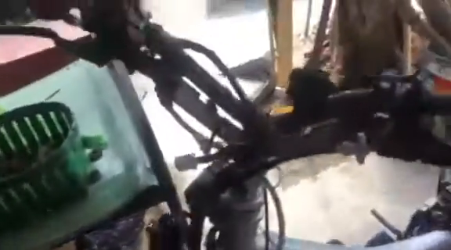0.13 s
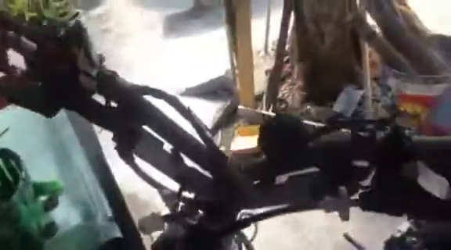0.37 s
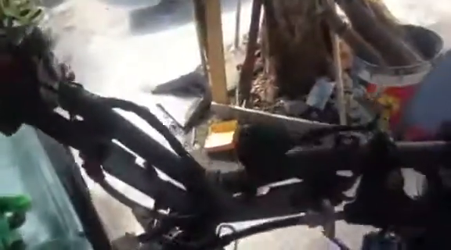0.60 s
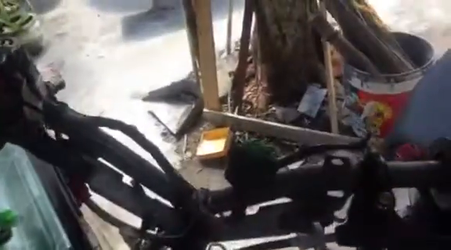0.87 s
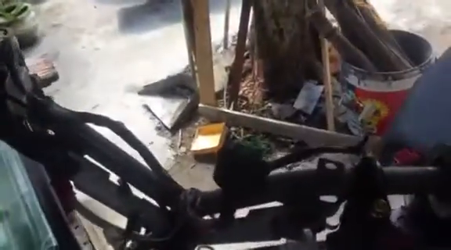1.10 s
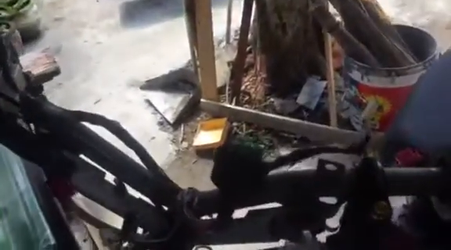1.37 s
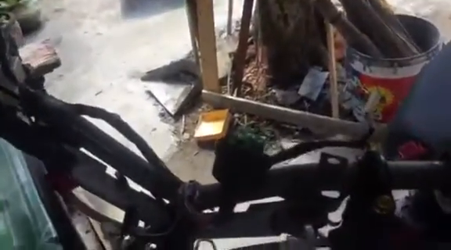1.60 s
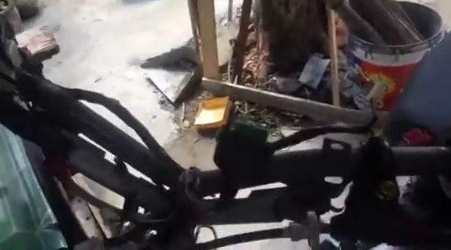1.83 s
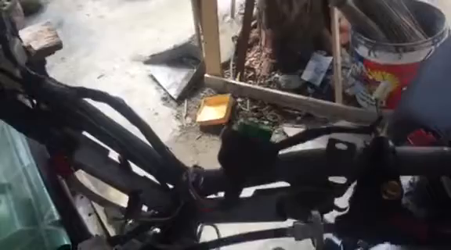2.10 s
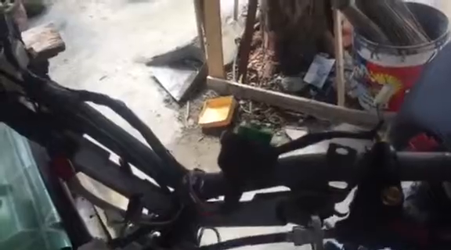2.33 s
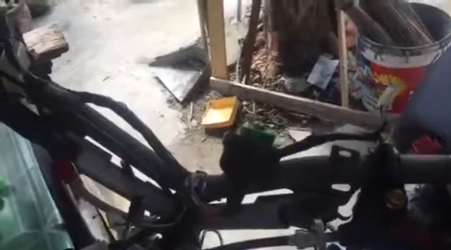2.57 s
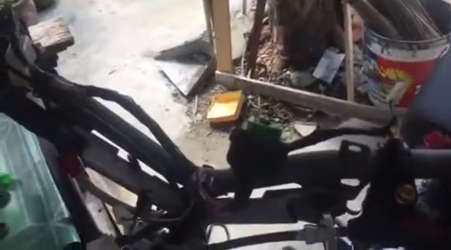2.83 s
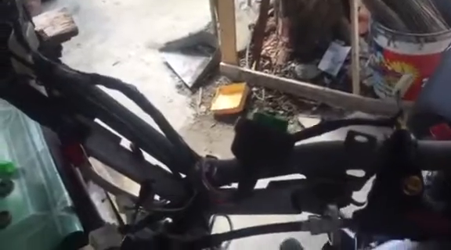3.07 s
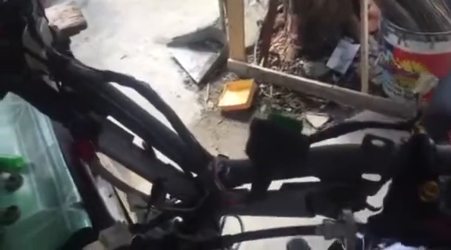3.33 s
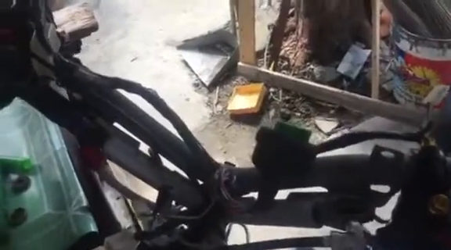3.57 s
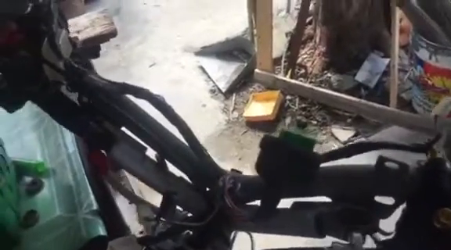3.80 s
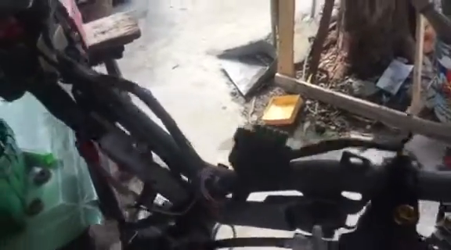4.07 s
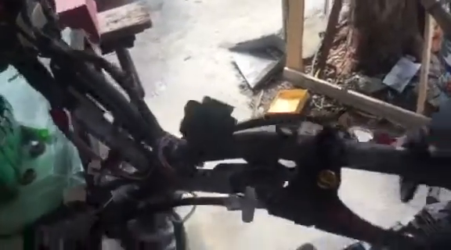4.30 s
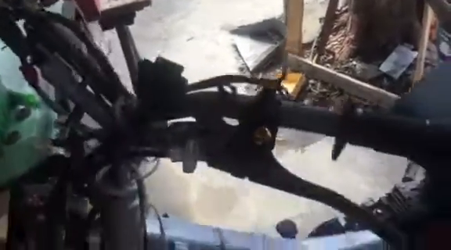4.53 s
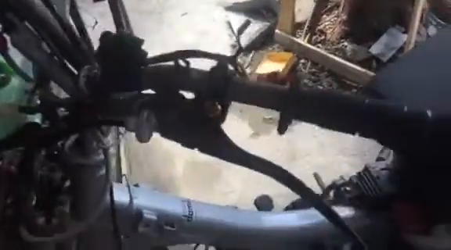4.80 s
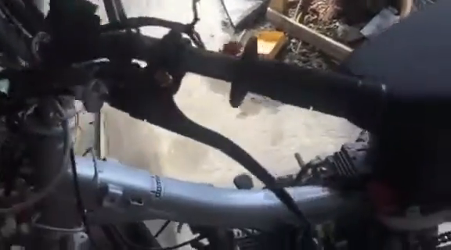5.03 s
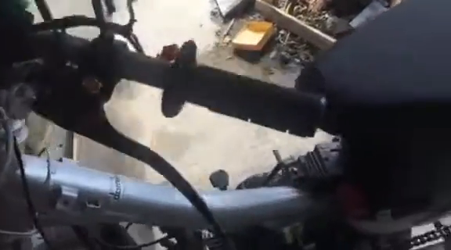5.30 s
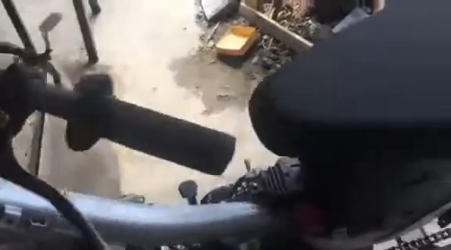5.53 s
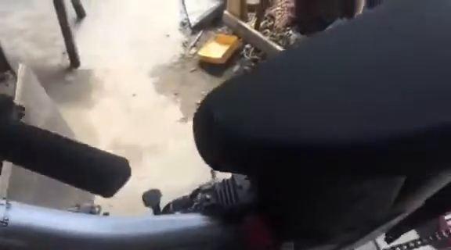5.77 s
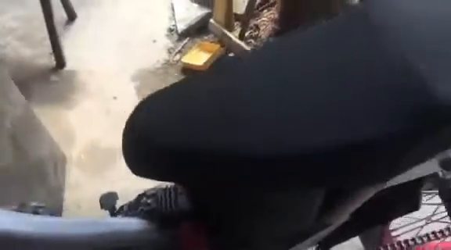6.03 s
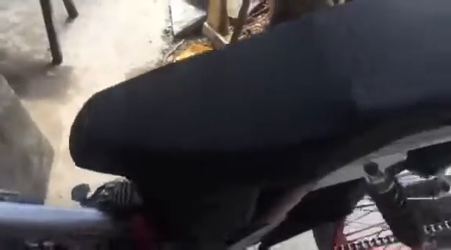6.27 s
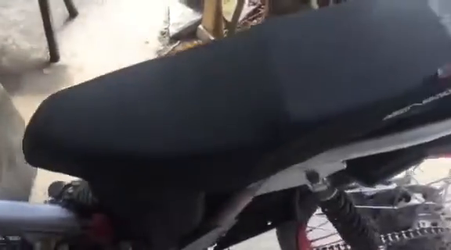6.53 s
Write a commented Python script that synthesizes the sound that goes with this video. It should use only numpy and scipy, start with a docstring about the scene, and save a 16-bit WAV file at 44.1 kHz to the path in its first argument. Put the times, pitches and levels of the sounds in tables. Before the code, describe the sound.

A single-cylinder motorcycle idles loudly and unevenly close by, thumping and spitting through its exhaust, with two short throttle blips in a small yard.

```python
"""Motorcycle idling in a yard

A single-cylinder motorcycle idles unevenly close to a phone: it fires on about every second cycle, and two
throttle blips give short runs of hard firings. Each exhaust stroke rings the pipe's modes, cracks at the outlet
and spits a jet of hiss. Filtered noise makes the valve ticks, the whir of chain and gears and the intake rasp;
nearby walls answer, and the loudest blasts overload the microphone."""
import sys
import numpy as np
from scipy import signal
from scipy.fft import rfft, irfft, next_fast_len
from scipy.io import wavfile
from scipy.ndimage import uniform_filter1d, map_coordinates

SR = 44100
rng = np.random.default_rng(int(sys.argv[2]) if len(sys.argv) > 2 else 0)


def unload_wav(signal):
    """Save mono or channel-first audio to the path in sys.argv[1] as 16-bit WAV at rate SR, clipped to [-1, 1]."""
    wavfile.write(
        sys.argv[1],
        SR,
        np.round(np.clip(np.atleast_2d(signal).T, -1, 1) * 32767).astype(np.int16),
    )


def magnitude_from_level(level_db):
    """Linear magnitude for a level in decibels (20 dB per decade)."""
    exponent = np.asarray(level_db, float) / 20
    return 10 ** exponent


N = 292824

# All levels are relative.
# Wall echoes against the direct sound: delay_s, level_db
WALL_ECHOES = [(.011, -16), (0.026, -17.5), (0.049, -19.5), (0.061, -21)]
# Decay of the yard's diffuse tail: band_hz, t60_s
YARD_DECAY = [(80, 0.14), (500, 0.27), (3000, 0.25), (9000, 0.057)]
# Spectrum of chain and gears: band_hz, level_db
WHIR_SPECTRUM = [(260, -21), (450, -1), (795, -1.5), (903, -0.5), (1700, -0.5), (2250, -4), (2420, -5),
                 (3240, -10), (4230, -16), (8380, -27.5), (9270, -50), (12100, -58.5), (20400, -120)]
# Running noise over time: time_s, whir_db, tick_db
RUNNING_LEVELS = [(0.0, -31, -30), (0.6, -32.5, -30), (1.35, -34.5, -29.5), (1.55, -31.5, -29.5),
                  (1.7, -31, -40.5), (1.87, -35.5, -60), (2.42, -36.5, -40), (2.74, -34.5, -28.5),
                  (2.94, -30.5, -30), (3.16, -35, -35), (3.92, -34, -32), (5.05, -33, -28.5),
                  (6.64, -33.5, -32)]
# Resonances of the engine cases: pitch_hz, width_hz, level_db
CASE_RESONANCES = [(1830, 110, 3), (2620, 270, -6.5), (3730, 810, -4.5), (4500, 200, -0.5),
                   (5350, 430, -4.5), (6430, 750, -1), (6980, 650, -1), (8610, 260, -1)]
# Resonances of the open carburettor: pitch_hz, width_hz, level_db
INTAKE_RESONANCES = [(2170, 310, -2.5), (2586, 250, 0.5), (2999, 350, -0.5), (5550, 450, -6.5),
                     (6600, 350, -11.5)]
# Throttle blips: start_s, open_for_s, rasp_db, speed_gain_cycles_per_s, boom_gain_hz
BLIP_LIST = [(1.585, .3, -21, 15.5, 21), (2.916, .21, -19.5, 10, 13.1)]
# Cycles that fire: start_s, boom_db, bark_db, jet_db, rise_ms
FIRING_LIST = [(-0.107, -1.5, 10, -20, 11), (0.085, 5, 3, -16, 11), (0.2733, 4, 3, -25, 23),
               (0.4783, 3.5, 0, -15.5, 3.4), (0.6617, 2.5, 2.5, -20, 11), (0.8574, 4.5, 4, -19.5, 19),
               (1.058, 4.5, 3, -19, 12), (1.2691, 3, -2.5, -17, 5.5), (1.486, 2, -1, -23.8, 14),
               (1.6031, 2.5, 3.5, -14.5, 2.5), (1.6685, 2, -1.5, -13.5, 0.7), (1.721, 1.5, 4, -15, 1.1),
               (1.7613, 3.5, 0.5, -17, 0.6), (1.8416, -2.5, -0.5, -21.5, 0.72),
               (2.4393, -3.5, -1, -28.5, 10), (2.6328, -37, -9.5, -40, 6.3), (2.7742, -2, 2, -17, 6.8),
               (2.92, 1.5, 4.5, -15, 5.5), (2.9778, 1, 4, -19, 5.7), (3.0296, -7, 1.5, -21.5, 2.5),
               (3.0765, -0.5, 0, -24.5, 1.3), (3.3653, -10, -7.5, -32, 12), (3.4154, -1, 2.4, -25, 8.6),
               (3.5911, -30, -3, -36, 26), (3.651, -8, -0.5, -29, 9.7), (3.782, -5.5, 2, -18.5, 8),
               (3.9206, -5, -0.5, -17, 4.9), (4.0603, -5, -2.5, -33, 7.1), (4.2152, -1.5, 0.5, -20.5, 5.6),
               (4.373, -0.5, 1.5, -18.5, 8), (4.5329, -0.5, 1, -17.5, 5), (4.6841, -3, -2.5, -30, 9.7),
               (4.7638, -12, -8, -28, 3.9), (4.8449, -1.5, 2.5, -21, 6.3), (5.0164, 2, 3, -15.5, 7.8),
               (5.1826, 0, 1.3, -18, 6.9), (5.3561, -1, 0.8, -19.5, 7.7), (5.5397, 1, 3, -19, 7.7),
               (5.7143, 2.2, 4.5, -18, 11), (5.8811, -1.5, 4, -29.5, 21), (5.9708, -1.5, -2.5, -17, 2.5),
               (6.1406, -2.5, -3, -23, 4.8), (6.3243, 1.5, -1.5, -18.5, 2.1), (6.497, -1, -3, -21, 7),
               (6.585, 1.5, -1.5, -18.5, 4.7)]
# Random spread of the unfired cycles (standard deviation): boom_db, bark_db, jet_db
MISS_SPREAD_DB = [2, 1.5, 3.5]
# Modes of exhaust pipe and silencer at idle boom pitch: pitch_hz, level_db, t60_s
PIPE_MODES = [(63.8, -12, 0.1), (89.14, -5, 0.2), (143.7, 8.5, 0.024), (198.3, -1, 0.062),
              (223.3, -17, 0.19), (248.2, -6, 0.023), (303, -31.5, .1), (356.3, -6.5, 0.026),
              (386.6, -22.5, 0.13), (414.8, -16, 0.093)]
# The phone drifts toward the silencer, whose shell knocks above SHELL_HZ: time_s, level_db
SHELL_NEARNESS = [(0, -4), (3.3, -4), (4.3, 2), (6.64, 1)]
# Tailpipe crack, before jet speed shifts its pitch: pitch_hz, level_db, t60_s
OUTLET_CRACK = [(1464, -8.5, 0.11), (1827, 2, 0.043), (2043, -2, 0.062), (2470, -9.5, 0.04)]
# Spectrum of the gas jet: band_hz, level_db
JET_SPECTRUM = [(290, -0.5), (500, -2), (646, -4), (921, -5.5), (2040, -4), (3050, -11), (3360, -12),
                (4620, -11), (5030, -11.5), (6670, -7), (9270, -12), (12100, -45), (20400, -120)]
# Spectrum of gas churning in the pipe: band_hz, level_db
CHURN_SPECTRUM = [(25, -47), (50, 1), (70, -14.5), (90, -2.5), (130, 2), (185, 0), (280, -13), (335, -13),
                  (362, -8.5), (400, -14), (520, -28.5), (900, -40.5)]

BOOM_HZ, SHELL_HZ = 120, 375  # boom modes lie below BOOM_HZ, bark modes above; shell modes above SHELL_HZ
IDLE_HZ = 89  # boom pitch at which the pipe modes are listed
HOT_DAMPING = 3.5  # power of the pitch ratio by which fast hot flow shortens the ring
IDLE_CYCLES_PER_S, SPIN_UP_S, COAST_S = 10.6, 0.18, 0.76  # speed climbs after a blip opens, then decays
WARM_UP_S, COOL_S = 0.2, 0.12  # hot gas raises the pipe's pitch
OPEN_S, CLOSE_S, SAG_DB_PER_S = 0.02, 0.045, 22.5  # throttle slide and sag of its rasp
# An unfired cycle only pumps gas
MISS_BOOM_DB, MISS_BARK_DB, MISS_JET_DB, MISS_RISE_MS = -6.5, -22, -39.5, 5.2
MISS_FADE_DB = 0.05  # boom lost with each further miss
BARK_DB_PER_SPEED, JET_DB_PER_SPEED = 0.85, 0.4133  # miss gain per cycle/s over idle
MISS_SHARP = 1.04  # pitch ratio
INTAKE_SHARE, INTAKE_BOOM_DB, INTAKE_FOLLOWS = 0.495, -14.5, 0.64  # place in cycle, level, share of stroke's dB


def unit(x):
    """Scale to rms 1."""
    return x / np.sqrt(np.mean(x ** 2) + 1e-20)


def along(points, hz):
    """Read (Hz, value) points on a log frequency axis."""
    f, v = np.transpose(points)
    return np.interp(np.log(hz + 1), np.log(f + 1), v)


def wobble(rate):
    """A smooth random curve, rate knots a second."""
    return map_coordinates(rng.standard_normal(int(N * rate / SR) + 4), [np.arange(N) * rate / SR])


def filtered(x, response):
    """Filter x by a response of frequency."""
    m = next_fast_len(N + SR // 2)
    return irfft(rfft(x, m) * response(np.fft.rfftfreq(m, 1 / SR)), m)[:N]


def shaped(x, spectrum):
    """Colour x by a spectrum table, at rms 1."""
    return unit(filtered(x, lambda hz: magnitude_from_level(along(spectrum, hz))))


def noise(spectrum):
    """Coloured noise of rms 1."""
    return shaped(rng.standard_normal(N), spectrum)


def resonant(x, peaks):
    """Pass x through parallel resonances of alternating sign, at rms 1."""
    def response(f):
        total = 0
        for k, (centre, width, db) in enumerate(peaks):
            band = 1j * f * width
            total = total + (-1) ** k * magnitude_from_level(db) * band / (centre * centre - f * f + band)
        return total
    return unit(filtered(x, response))


def patchy(x, depth_db):
    """Give x random patches of gain, about 700 Hz by 23 ms, at rms 1."""
    z = signal.stft(x, nperseg=256)[2]
    field = uniform_filter1d(rng.standard_normal(z.shape), size=4, axis=0)
    field = uniform_filter1d(field, size=8, axis=1)
    return unit(signal.istft(z * magnitude_from_level(depth_db * unit(field)), nperseg=256)[1][:N])


def add(track, s, sound):
    """Mix a sound into the track at s seconds."""
    i = round(s * SR)
    part = track[max(i, 0):max(i + len(sound), 0)]
    part += sound[max(-i, 0):][:len(part)]


def attack(t, rise_s):
    """Exponential onset with time constant rise_s."""
    return 1 - np.exp(-t / rise_s)


def running(column):
    """Gain curve of one column of RUNNING_LEVELS."""
    rows = np.transpose(RUNNING_LEVELS)
    return magnitude_from_level(np.interp(np.arange(N) / SR, rows[0], rows[column]))


def yard(x):
    """Nearby walls return a few echoes and a diffuse tail that dies at its own rate in each band."""
    hz, t, z = signal.stft(rng.standard_normal(SR // 2), SR, nperseg=256)
    decay = magnitude_from_level(-60 * t / along(YARD_DECAY, hz)[:, None])
    tail = signal.istft(z * decay, SR, nperseg=256)[1]
    answer = magnitude_from_level(-17) * np.pad(tail / np.linalg.norm(tail), (SR // 50, 0))
    for s, db in WALL_ECHOES:
        answer[round(s * SR)] += magnitude_from_level(db)
    return signal.fftconvolve(x, answer)[:N]


def after_blips(s, column, climb_s, fall_s):
    """What the blips add at times s: a ramp up to the column's value, then a decay once the slide shuts."""
    total = 0
    for row in BLIP_LIST:
        climb = np.clip((s - row[0]) / climb_s, 0, 1)
        fall = np.exp(-np.maximum(s - row[0] - row[1], 0) / fall_s)
        total = total + row[column] * climb * fall
    return total


def boom_pitch(s):
    """Boom pitch in Hz, raised by hot gas during the blips."""
    return IDLE_HZ + after_blips(s, 4, WARM_UP_S, COOL_S)


def cycles():
    """All strokes (start_s, boom_db, bark_db, jet_db, boom_hz, rise_ms); crank speed fits misses between firings."""
    clock = np.arange(-SR // 4, N) / SR
    extra = after_blips(clock, 3, SPIN_UP_S, COAST_S)
    turned = np.cumsum(IDLE_CYCLES_PER_S + extra) / SR
    rows = [(s, boom, bark, jet, boom_pitch(s), rise) for s, boom, bark, jet, rise in FIRING_LIST]
    at = np.interp(np.transpose(FIRING_LIST)[0], clock, turned)
    chance = rng.standard_normal((len(FIRING_LIST), 16, 3)) * MISS_SPREAD_DB
    for first, last, luck in zip(at, at[1:], chance):
        count = max(round(last - first), 1)
        between = np.linspace(first, last, count + 1)[1:-1]
        for k, s in enumerate(np.interp(between, turned, clock)):
            fast = np.interp(s, clock, extra)
            boom = MISS_BOOM_DB - MISS_FADE_DB * k
            bark = MISS_BARK_DB + BARK_DB_PER_SPEED * fast
            jet = MISS_JET_DB + JET_DB_PER_SPEED * fast
            levels = np.array([boom, bark, jet]) + luck[k]
            rows.append((s, *levels, MISS_SHARP * boom_pitch(s), MISS_RISE_MS))
    return sorted(rows)


def chain_whir():
    """Chain and gears whir as patchy noise, with loose grains where links strike."""
    strikes = (rng.random(N) < 600 / SR) * rng.standard_normal(N)  # about 600 a second
    grains = shaped(strikes * magnitude_from_level(3.7 * wobble(30)), WHIR_SPECTRUM)
    whir = magnitude_from_level(0.53 * wobble(14) + 0.73 * wobble(150)) * patchy(noise(WHIR_SPECTRUM), depth_db=2.5)
    return running(1) * (0.86 * whir + 0.54 * grains)


def valve_gear(strokes):
    """Valves seat near fixed points of every cycle and rattle the resonant engine cases."""
    starts = np.transpose(strokes)[0]
    seats = np.array([0.2, 0.45, 0.85])  # share of the cycle
    seat_db = np.array([-10, 0, -10])
    jitter = 0.0087 * rng.standard_normal((len(starts) - 1, len(seats)))
    times = starts[:-1, None] + np.diff(starts)[:, None] * (seats + jitter)
    sizes = seat_db + 2 * rng.standard_normal(times.shape)
    rattle = np.full(N, 0.15)  # steady floor under the ticks
    t = np.arange(SR // 12) / SR
    for s, size_db in zip(times.ravel(), sizes.ravel()):
        add(rattle, s, magnitude_from_level(size_db - 60 * t / 0.08) * attack(t, 0.004))
    clatter = resonant(rattle * magnitude_from_level(3 * wobble(500)) * rng.standard_normal(N), CASE_RESONANCES)
    return magnitude_from_level(-8) * running(2) * clatter


def throttle_snap():
    """The slide snaps open with a dry clack, a short burst of noise."""
    snap = np.zeros(N)
    t = np.arange(SR // 10) / SR
    for start, *_ in BLIP_LIST:
        add(snap, start + 0.0034, magnitude_from_level(-22 - 60 * t / 0.05))
    return snap * noise(WHIR_SPECTRUM)


def intake_rasp(strokes):
    """With the slide open, air rasps through the carburettor, one ragged gulp for each cycle."""
    clock = np.arange(N) / SR
    slide = np.zeros(N)
    for s, held, db, _, _ in BLIP_LIST:
        opening = (clock - s) / OPEN_S
        closing = 1 + (s + held - clock) / CLOSE_S
        slide += magnitude_from_level(db - SAG_DB_PER_S * np.abs(clock - s)) * np.clip(np.minimum(opening, closing), 0, 1)
    gulps = np.full(N, 0.15)  # steady flow between gulps
    t = np.arange(SR // 10) / SR
    for start, _, _, jet_db, _, _ in strokes:
        add(gulps, start, magnitude_from_level(jet_db + 22.5 - 60 * t / 0.098) * attack(t, 0.0037))
    rasp = resonant(rng.standard_normal(N), INTAKE_RESONANCES)
    return slide * magnitude_from_level(3.7 * wobble(300)) * gulps * rasp


def pipe_columns():
    """Pipe modes as columns, with neighbouring modes in opposite phase."""
    hz, db, t60 = np.transpose(PIPE_MODES)[:, :, None]
    sign = -(-1.0) ** np.arange(len(PIPE_MODES))[:, None]
    return hz, db, t60, sign


def intake_thumps(strokes):
    """The inlet stroke sends a weaker thump down the pipe, growing with the stroke before it."""
    track = np.zeros(N)
    t = np.arange(SR // 4) / SR
    hz, db, t60, sign = pipe_columns()
    for (s, boom_db, _, _, boom_hz, _), (after, *_) in zip(strokes, strokes[1:]):
        level_db = db + INTAKE_BOOM_DB + INTAKE_FOLLOWS * boom_db
        tones = np.sin(2 * np.pi * hz * boom_hz / IDLE_HZ * t)
        thump = (hz < BOOM_HZ) * sign * magnitude_from_level(level_db - 60 * t / t60) * tones
        add(track, s + INTAKE_SHARE * (after - s), attack(t, 0.0036) * thump.sum(axis=0))
    return track


def pipe_ring(strokes):
    """Each exhaust stroke rings the pipe's decaying modes; hotter gas sharpens and damps them."""
    ring = np.zeros(N)
    t = np.arange(SR // 4) / SR
    hz, db, t60, sign = pipe_columns()
    scatter = rng.standard_normal((len(strokes), len(PIPE_MODES), 1))
    for (s, boom_db, bark_db, _, boom_hz, rise_ms), chance in zip(strokes, scatter):
        ratio = boom_hz / IDLE_HZ
        level_db = db + np.where(hz < BOOM_HZ, boom_db, bark_db) + 0.6 * chance
        level_db = level_db + (hz > SHELL_HZ) * np.interp(s, *np.transpose(SHELL_NEARNESS))
        level_db = level_db + 1.67 * (hz > 230) * max(4 - rise_ms, 0)  # a steep front feeds the upper modes
        decay = magnitude_from_level(level_db - 60 * t / t60 * ratio ** HOT_DAMPING)
        modes = sign * decay * np.sin(2 * np.pi * hz * ratio * t)
        add(ring, s, attack(t, max(rise_ms, 0.5) / 1000) * modes.sum(axis=0))
    return ring


def outlet_crack(strokes):
    """Each stroke excites short tones at the tailpipe outlet; a faster jet cracks higher."""
    crack = np.zeros(N)
    t = np.arange(SR // 4) / SR
    hz, db, t60 = np.transpose(OUTLET_CRACK)[:, :, None]
    spread = rng.standard_normal((len(strokes), 2, len(OUTLET_CRACK), 1))
    for (s, _, _, jet_db, _, _), (size, detune) in zip(strokes, spread):
        speed = 2 ** ((max(jet_db, -24) + 21.5) / 22)
        pitch = hz * speed * (1 + 0.04 * detune)
        tones = magnitude_from_level(db + 2 * size - 60 * t / t60) * np.sin(2 * np.pi * pitch * t)
        add(crack, s, magnitude_from_level(0.75 * jet_db - 7.5) * attack(t, 0.0025) * tones.sum(axis=0))
    return crack * magnitude_from_level(3.7 * wobble(600))


def gas_jet(strokes):
    """Each stroke blows a jet of patchy hiss with a two-part decay."""
    jet = np.zeros(N)
    t = np.arange(SR // 4) / SR
    spit = magnitude_from_level(-60 * t / 0.13) + magnitude_from_level(-7.5 - 60 * t / 0.1)
    for s, _, _, jet_db, _, _ in strokes:
        add(jet, s, magnitude_from_level(jet_db + 1) * attack(t, 0.006) * spit)
    return jet * patchy(noise(JET_SPECTRUM), depth_db=4.5)


def gas_churn(strokes):
    """Gas churns in the pipe as low noise that swells with each stroke over a faint floor."""
    churn = np.zeros(N)
    t = np.arange(SR // 4) / SR
    for s, boom_db, bark_db, *_ in strokes:
        add(churn, s, magnitude_from_level(0.86 * max(boom_db, bark_db) - 60 * t / 0.27) * attack(t, 0.0087))
    return (magnitude_from_level(-22) * churn + magnitude_from_level(-35)) * magnitude_from_level(2 * wobble(22)) * noise(CHURN_SPECTRUM)


def exhaust(strokes):
    """Ring and churn sound in the pipe; gas leaves on the pressure crests and stalls in the troughs."""
    ring = pipe_ring(strokes) + intake_thumps(strokes)
    surge = magnitude_from_level(1.1 * np.clip(ring, -0.6, 0.35))
    outflow = gas_jet(strokes) + outlet_crack(strokes)
    return ring + gas_churn(strokes) + surge * magnitude_from_level(0.81 * wobble(250)) * outflow


def scene():
    """The engine and the yard's answer."""
    strokes = cycles()
    mechanics = chain_whir() + valve_gear(strokes)
    engine = mechanics + throttle_snap() + intake_rasp(strokes) + exhaust(strokes)
    return (engine + yard(engine))[None]


def roll_off(x):
    """The treble ends steeply here."""
    return signal.sosfilt(signal.butter(12, 9420, fs=SR, output="sos"), x)


def record(dry):
    """The phone cuts the deep bass and the top band, then its input saturates on the blasts."""
    low_hz, top_hz, ceiling = 31.5, 9103, 0.72

    def response(hz):
        bass_cut = hz ** 2 / (hz ** 2 + low_hz ** 2)
        return bass_cut / (1 + (hz / top_hz) ** 120)

    x = filtered(dry[0], response)
    x = x / (1 + np.abs(x / ceiling) ** 8) ** (1 / 8)
    return roll_off(x[None])


dry = scene()
out = record(dry)
unload_wav(out)
```